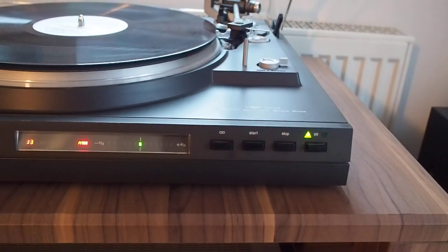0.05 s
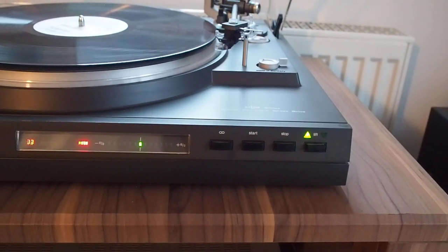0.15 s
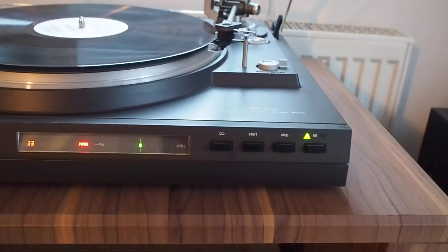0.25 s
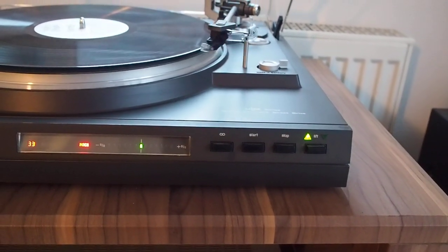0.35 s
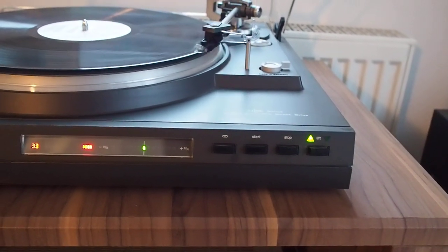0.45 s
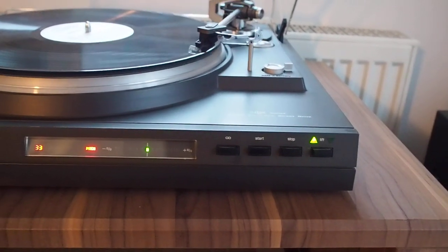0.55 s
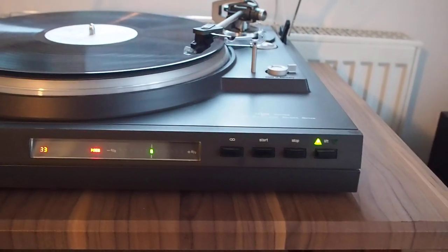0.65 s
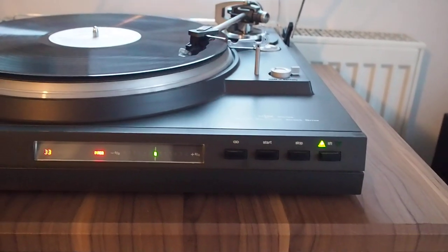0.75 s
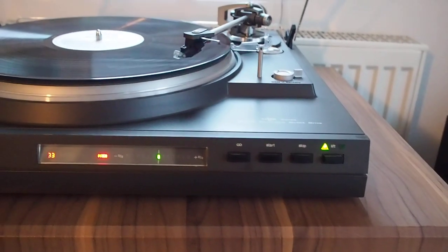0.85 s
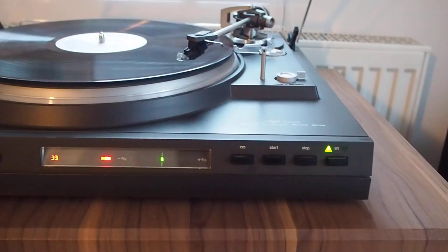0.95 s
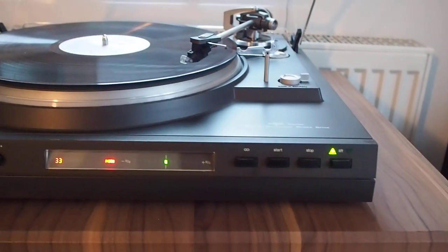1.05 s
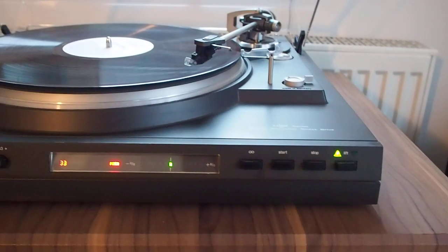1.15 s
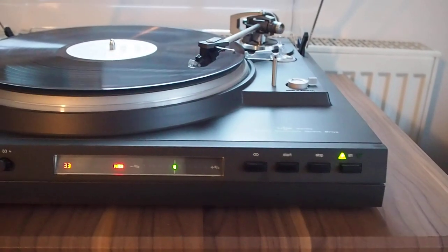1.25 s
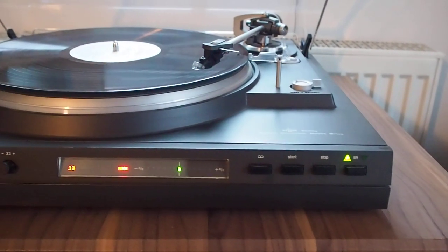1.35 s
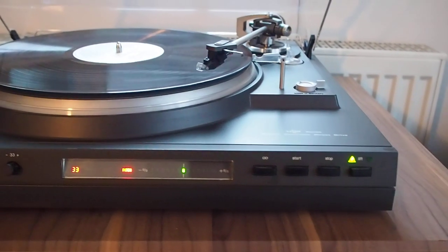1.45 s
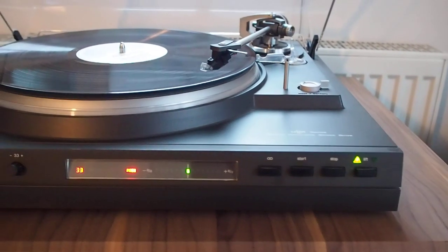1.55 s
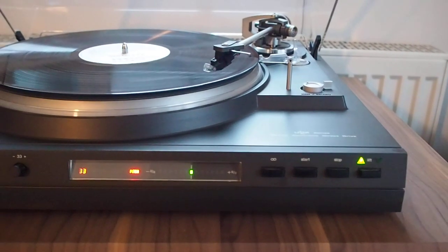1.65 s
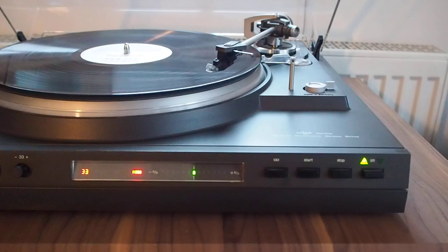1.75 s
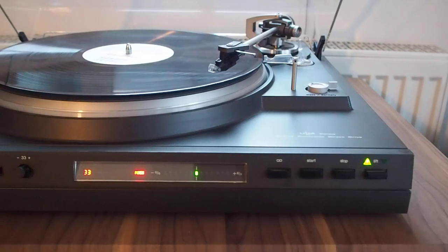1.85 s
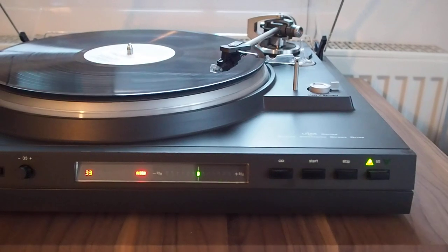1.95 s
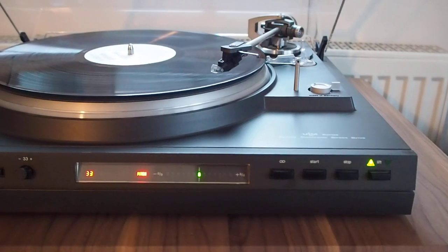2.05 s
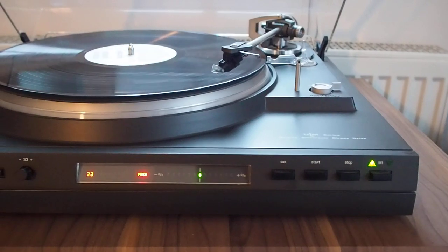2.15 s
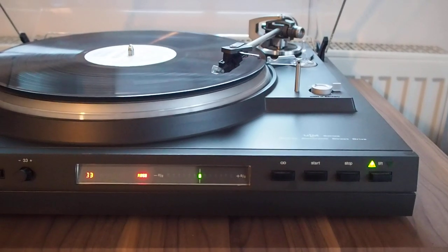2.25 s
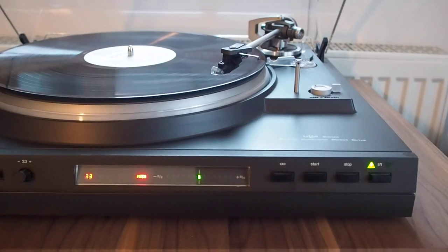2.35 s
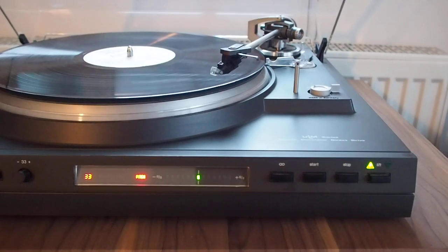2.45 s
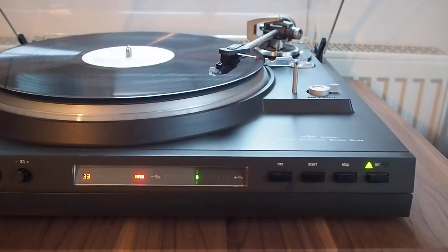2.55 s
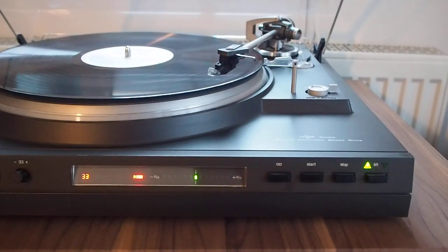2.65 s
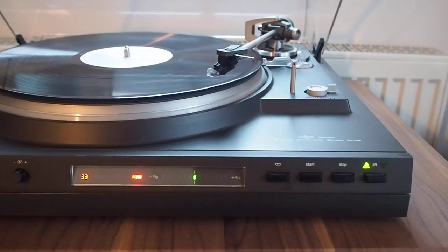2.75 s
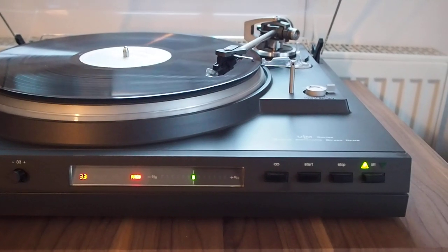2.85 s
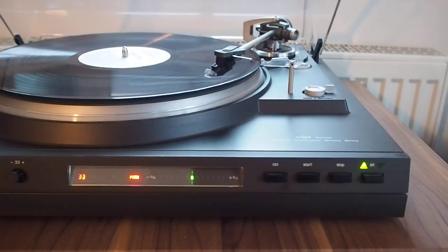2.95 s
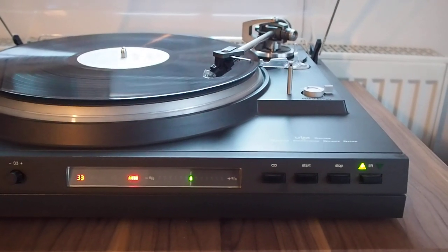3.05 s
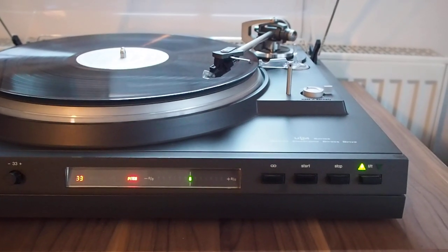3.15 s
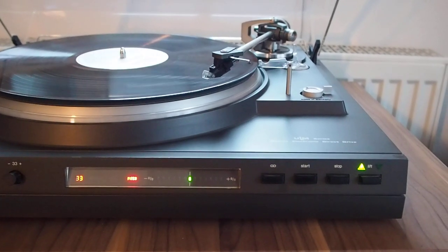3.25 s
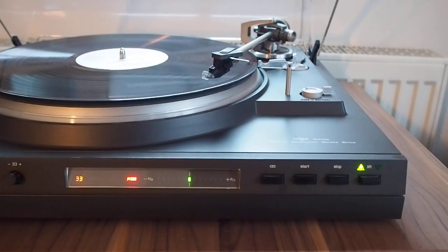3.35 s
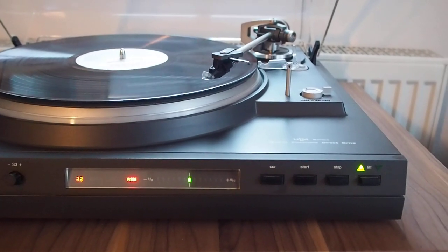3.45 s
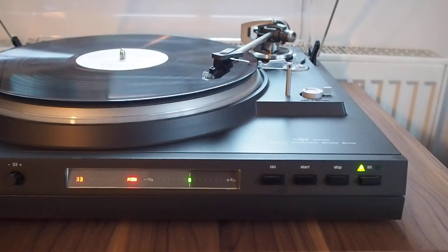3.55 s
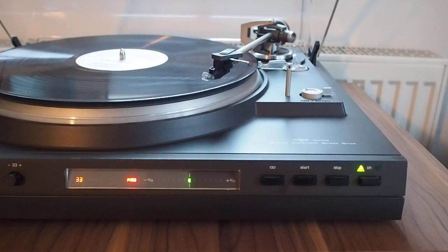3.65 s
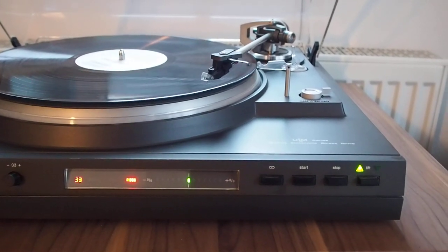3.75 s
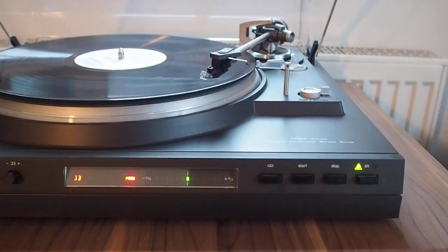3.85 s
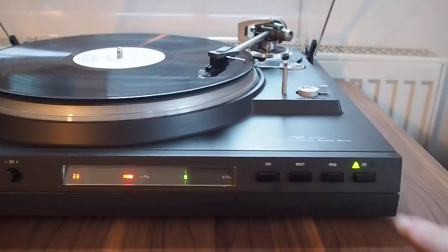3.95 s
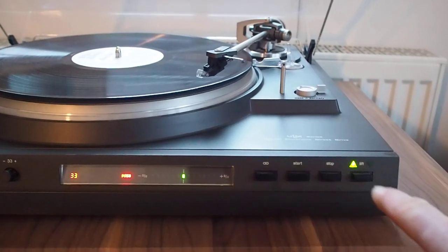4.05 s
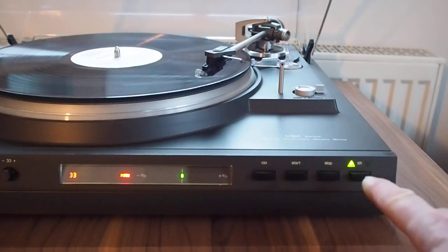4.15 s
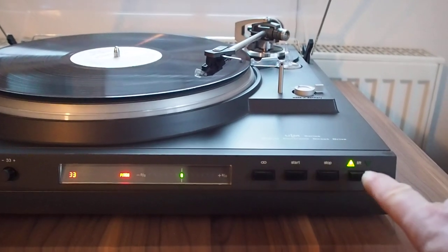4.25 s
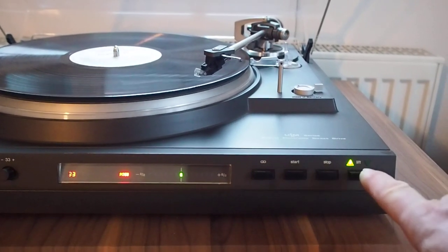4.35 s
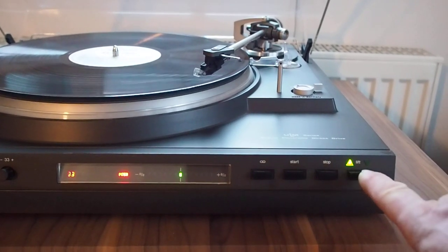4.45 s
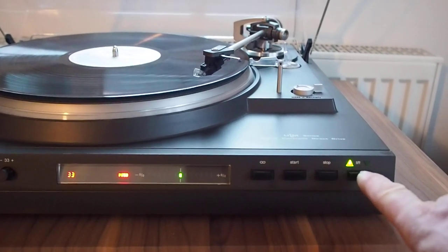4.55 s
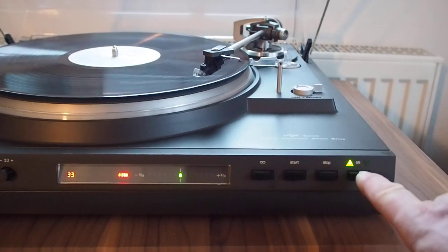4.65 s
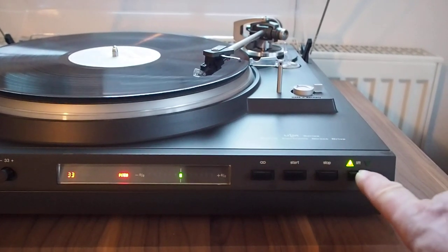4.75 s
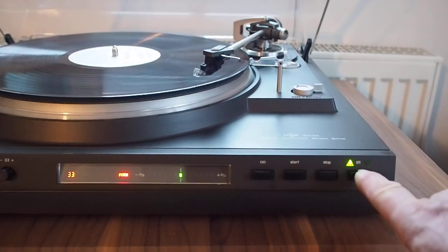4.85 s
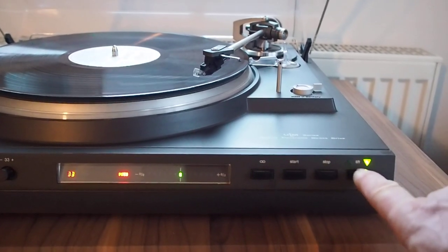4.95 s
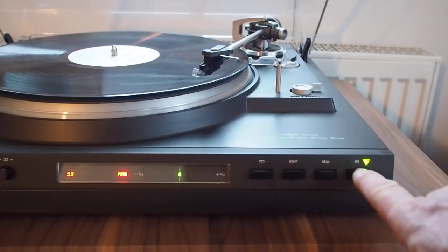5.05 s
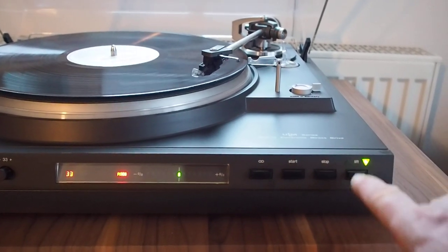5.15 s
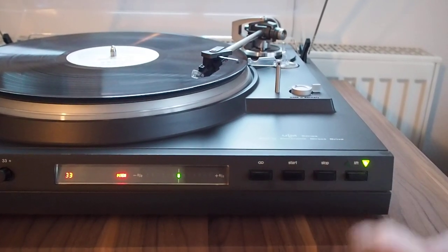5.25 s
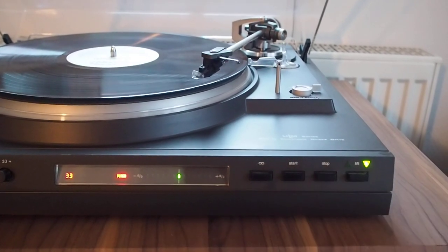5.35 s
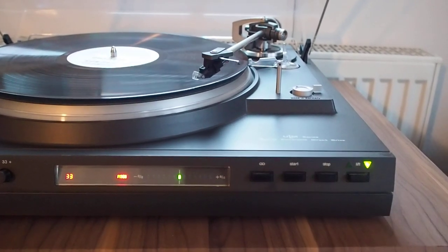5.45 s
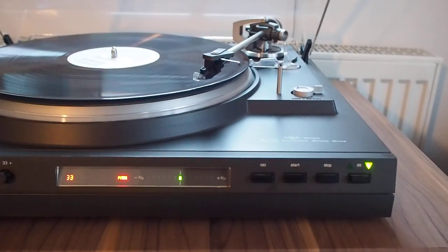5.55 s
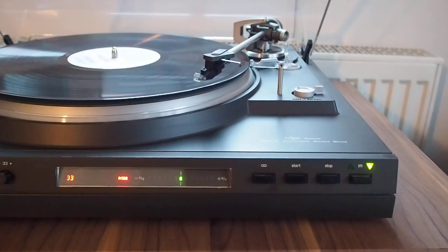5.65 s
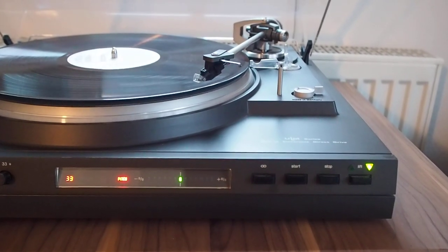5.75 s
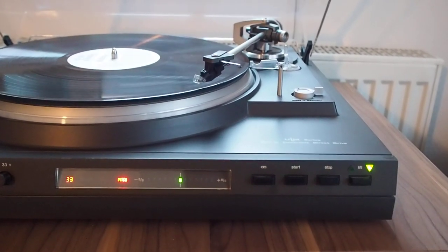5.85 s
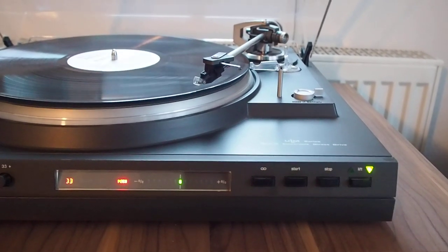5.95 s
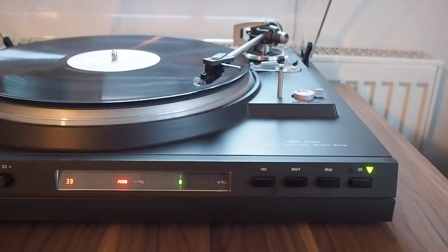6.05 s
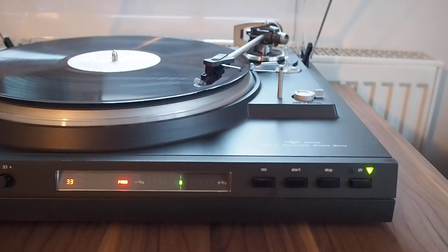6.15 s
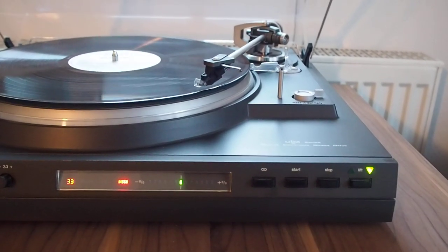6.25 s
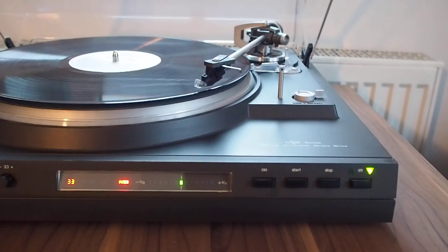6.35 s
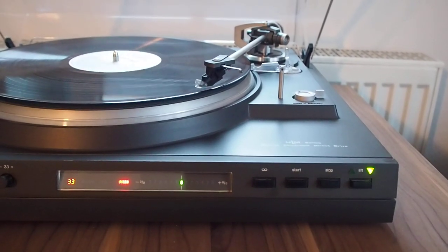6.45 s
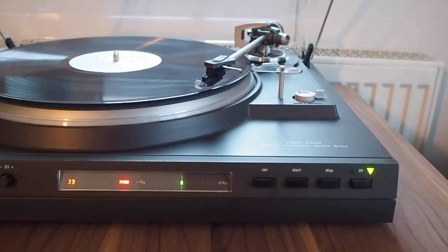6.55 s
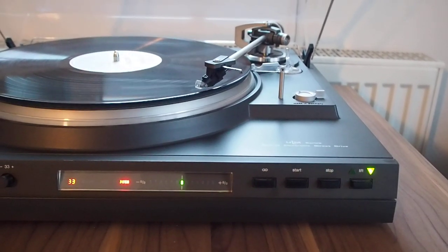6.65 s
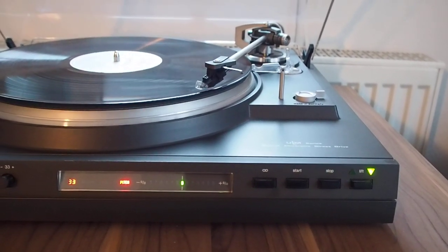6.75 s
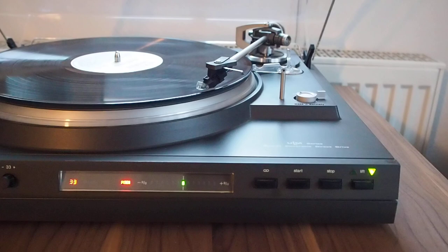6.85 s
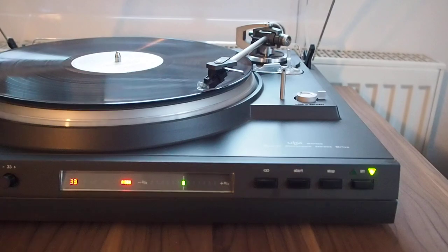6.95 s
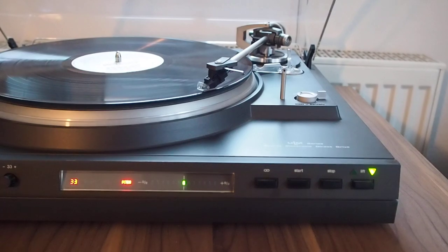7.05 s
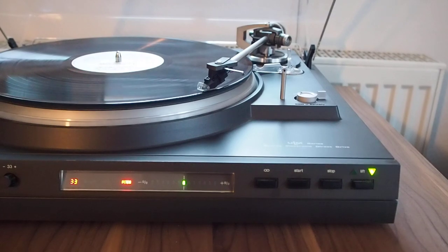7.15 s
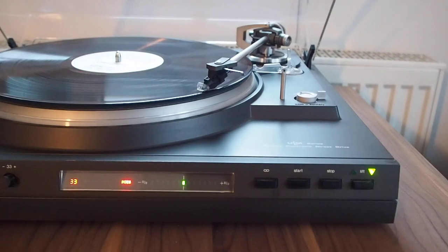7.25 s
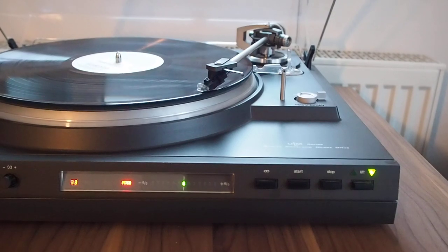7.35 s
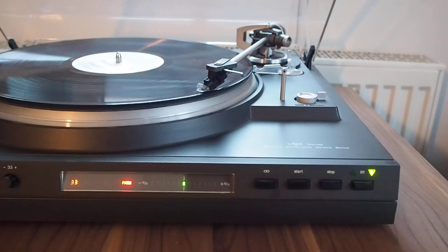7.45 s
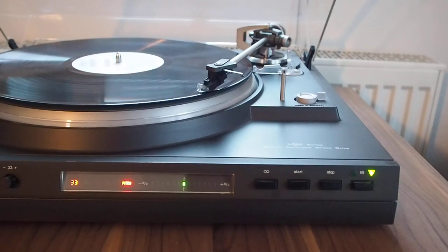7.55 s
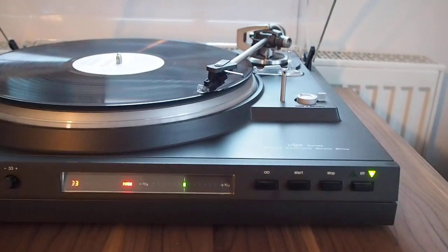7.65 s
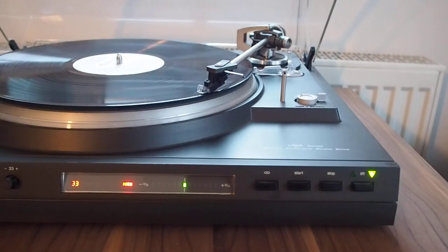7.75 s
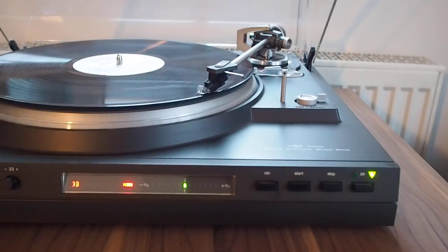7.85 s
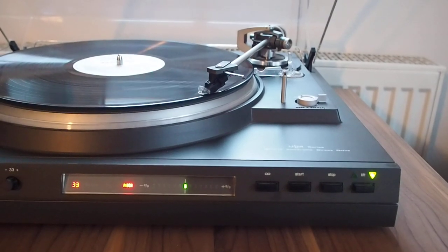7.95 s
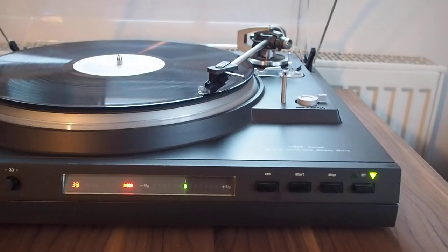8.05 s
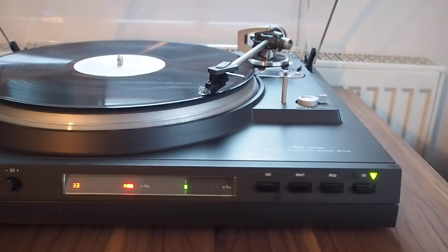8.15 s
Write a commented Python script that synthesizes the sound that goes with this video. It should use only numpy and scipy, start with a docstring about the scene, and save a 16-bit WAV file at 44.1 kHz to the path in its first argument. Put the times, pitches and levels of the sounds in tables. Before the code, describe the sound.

A quiet room with steady low rumble and microphone hiss, heard close to an automatic record player. Two faint ticks come at about 0.9 seconds, then soft dull knocks from the arm drive around 2.2. A sharp lever click at 2.6 starts a cluster of smaller mechanical clicks lasting until 3.3. Near 4 seconds the loudspeakers, farther away, give a short bassy thump with a little room ring. At 4.9 the lift button goes down with a crisp click and another thump, and it springs back with a second click around 5.2. The speakers thump again at 6.5 and pop softly at 7.2. At 7.4 the stylus lands with the loudest thump, a crack and a very brief scrape. Faint groove noise with a few small swells continues to the end, at about 8 seconds.

```python
"""A quiet room, close to an automatic record player. Levers click in the deck as the tonearm swings over, and a
finger presses and releases the lift button: each click is a burst of tiny impacts exciting the modes of the
deck or the button panel. Electrical pulses drive the loudspeakers and the room's bass modes into thumps, the
loudest as the stylus lands. Faint groove noise follows, over steady room rumble and microphone hiss."""
import sys
import numpy as np
from scipy import signal
from scipy.fft import rfft, irfft, next_fast_len
from scipy.io import wavfile
from scipy.ndimage import uniform_filter1d

SR = 44100
rng = np.random.default_rng(int(sys.argv[2]) if len(sys.argv) > 2 else 0)


def wrap_up_sound(samples):
    """Save the sound to the file named by the first command line argument, as 16-bit audio."""
    columns = np.atleast_2d(samples).T
    # keep every value between -1 and 1, then stretch to whole-number steps
    tamed = np.clip(columns, -1, 1)
    steps = np.round(tamed * 32767).astype(np.int16)
    wavfile.write(sys.argv[1], SR, steps)


N = 361459
TAPS = 16384
HZ = np.fft.rfftfreq(TAPS, 1 / SR)  # frequency axis of the gain curves

# Pulses reaching the loudspeakers, knock and crack relative to the bass: start_s, level_db, knock_db, crack_db
SPEAKER_PULSES = [(3.974, 22, -15.5, -7.5), (4.931, 20.3, -19, -18), (6.4623, 20.2, -12.5, -7.5),
                  (7.179, 8.8, -19, -16), (7.204, 9.8, -11.5, -7), (7.392, 34.3, -1.5, 0.5)]
# The stylus skidding into the groove: start_s, level_db, rise_s, decay_s
STYLUS_SKID = (7.411, 31.6, .011, 0.0028)
# Loudspeaker response: frequency_hz, gain_db
SPEAKER_RESPONSE = [(30, -55), (60, -25.5), (200, -11), (500, -16.5), (1150, -19), (1900, -32), (2700, -34),
                    (5500, -37), (9000, -52.5), (13000, -69), (16000, -83)]
# Standing waves of the room: pitch_hz, width_hz, gain_db
BASS_MODES = [(76.5, 14.7, 7.5), (99.4, 9.8, -1), (127.2, 7.6, -7.5), (169, 13.5, -3.5)]


def cone_thumps():
    """Impulse excitation: electrical pulses kick the loudspeaker cones and set the room's bass modes ringing."""
    out = np.zeros((1, N))
    gain = amp(read(SPEAKER_RESPONSE, HZ)) + sum(amp(db) * bell(hz, width) for hz, width, db in BASS_MODES)
    for start, db, knock_db, crack_db in SPEAKER_PULSES:
        colour_db = read([(110, 0), (450, knock_db), (4000, crack_db)], HZ)
        add(out, start, -impulse_response(gain * amp(db + colour_db))[None])
    start, db, rise, decay = STYLUS_SKID
    skid_db = read([(200, -20), (1500, -4), (4000, 0.5), (9000, 2.5)], HZ)
    scrape = impulse_response(gain * amp(db + skid_db))
    add(out, start, signal.fftconvolve(chatter(rise, decay), scrape)[None])
    return out[0]


# Early reflections off the walls: delay_s, gain_db
WALL_ECHOES = [(.0075, -4.5), (.0145, -11), (.0285, -10.5), (.038, -11)]
# Reverberation relative to the direct loudspeaker sound: frequency_hz, gain_db
SPEAKER_REVERB = [(70, -9), (160, 1), (300, 4), (700, 9), (1200, 4.5), (3000, 8.5), (9000, 4)]


def loudspeakers():
    """Multipath propagation: distant cones arrive as direct sound, wall echoes and a strong diffuse tail."""
    direct = cone_thumps()
    out = stereo(direct, 0) + reverberation(direct, SPEAKER_REVERB, onset_s=0.0058)
    reflected = tint(direct, [(120, -20), (450, -0.5)])  # furniture throws back little bass
    for k, (delay, db) in enumerate(WALL_ECHOES):
        lag = 3 * (-1) ** k  # samples; echoes come from either side in turn
        add(out, delay, amp(db) * np.array([np.roll(reflected, lag), np.roll(reflected, -lag)]))
    return out * pan(1.4)


# Levers catching: start_s, level_db, thud_db, knock_db, snap_db, low_ring_hz, high_ring_hz
LEVER_CATCHES = [ (0.888, -9, -10, 0, -11, 1880, 4660), (0.917, -12, -12, -4, -9, 1790, 2980),
                 (2.6103, 24, -3.5, 3.5, -2, 4140, 13200), (2.716, 9.5, 1, -7, -2, 2960, 4700),
                 (2.9442, 9.5, -2, 2.5, -0.5, 3120, 4520), (3.0155, 8, 12, 9.5, -23, 452, 4280),
                 (3.0617, 7, 6, -17, -10, 5130, 7900), (3.066, 15, 1, -8, -2, 4900, 8370),
                 (3.282, -0.5, 9, 6, -5, 4130, 5700)]
# Dull knocks of the arm drive: start_s, level_db, ring_hz
DRIVE_KNOCKS = [(2.168, -9.5, 590), (2.2556, -11.5, 525), (2.592, -16, 1020), (2.973, -14.5, 970)]
# Spectrum shared by the drive knocks: thud_db, knock_db, snap_db
DRIVE_COLOUR = (18, 21.3, -21)
# Broad radiation of the deck: frequency_hz, gain_db
DECK_RESPONSE = [(60, -62), (200, -18.5), (600, -15.5), (1400, -18), (2500, -24), (4000, -17), (5500, -13),
                 (9000, -15), (13000, -14), (16000, -25)]
# Deck resonances: pitch_hz, width_hz, gain_db
DECK_RESONANCES = [(253, 13, -4.5), (470, 44, -14), (539, 44, -9), (703, 47, -9), (980, 22, -1),
                   (1150, 44, -3), (1780, 180, -7.5), (2340, 26, -7), (2720, 93, -7.5), (3200, 200, -7.5),
                   (3560, 31, -3.5), (4154, 66, -5), (4820, 160, -19), (8050, 130, -14), (9060, 240, -8),
                   (11800, 200, -11), (12400, 360, -11)]


def levers(catch_rise_s=0.00286, knock_rise_s=0.0015, knock_ring_hz=1970):
    """Structure-borne sound: the levers and the arm drive strike the deck, which radiates at its modes."""
    catches = [(start, db, catch_rise_s, *colour) for start, db, *colour in LEVER_CATCHES]
    knocks = [(start, db, knock_rise_s, *DRIVE_COLOUR, hz, knock_ring_hz) for start, db, hz in DRIVE_KNOCKS]
    deck = body(DECK_RESPONSE, DECK_RESONANCES)
    return clicks(catches + knocks, deck, ring_db=11, bandwidth=0.088,
                  settle_s=0.009, firmness=0.13, pan_db=1.4)


# The button going down and springing back:
# start_s, level_db, rise_s, thud_db, knock_db, snap_db, low_ring_hz, high_ring_hz
BUTTON_CONTACTS = [ (4.9265, 12.5, 0.00025, -3, -1, -7, 2780, 3320),
                   (4.931, 15.5, 0.0025, -18, 0, 3, 5300, 8850),
                   (4.9452, 27.5, .0045, 0, 0, 1.5, 481, 2000),
                   (5.128, 14.5, 0.00061, -26, 3, -8.5, 2680, 4200),
                   (5.164, 2, 0.0044, -20, 18, -4, 3000, 4900),
                   (5.178, 18.5, 0.00039, 2, -17, -5, 5580, 8000),
                   (5.1805, 20, 0.0034, -4, -7.5, 5.5, 4800, 5570)]
# Broad radiation of the button panel: frequency_hz, gain_db
PANEL_RESPONSE = [(60, -57), (230, -13.5), (330, -33), (700, -21), (1450, -29), (2300, -10), (5000, -14),
                  (8000, -16.5), (13000, -22), (16000, -29)]
# Panel resonances: pitch_hz, width_hz, gain_db
PANEL_RESONANCES = [(451, 15, -4.5), (513, 30, -4), (657, 24, -11), (710, 45, -7), (980, 37, -14),
                    (1160, 71, -11), (1720, 95, -5.5), (1892, 55, 2.5), (2060, 41, -17), (2640, 68, -6.5),
                    (3220, 120, -6), (4240, 64, -6), (4960, 51, -2), (5700, 76, -10), (5620, 35, -3),
                    (8500, 150, -24.5), (11120, 200, -11), (11700, 150, -19), (13900, 200, -20)]


def lift_button():
    """Impact excitation: pressing and releasing the button sets its panel ringing."""
    panel = body(PANEL_RESPONSE, PANEL_RESONANCES)
    return clicks(BUTTON_CONTACTS, panel, ring_db=5, bandwidth=0.1,
                  settle_s=0.0154, firmness=0.368, pan_db=0.3)


# Anchors of a click's spectrum: thud_hz, knock_hz, flat_from_hz, flat_to_hz, snap_hz
CLICK_BANDS = [350, 1050, 2600, 5500, 12500]
# Side relative to mid for a near source: frequency_hz, gain_db
CLICK_WIDTH = [(200, -25), (1000, -20), (2500, -10.5), (5000, -7), (8000, 1), (13000, -4)]
# Reverberation relative to a click: frequency_hz, gain_db
CLICK_REVERB = [(100, 1.5), (300, -2), (1000, -4), (3000, -12), (6000, -11), (14000, -11)]


def clicks(rows, body_gain, ring_db, bandwidth, settle_s, firmness, pan_db):
    """Source and filter: contact chatter drives a body; the moving part adds colour and two resonances."""
    direct, radiated = np.zeros((2, N)), np.zeros((1, N))
    for start, db, rise, thud_db, knock_db, snap_db, low_hz, high_hz in rows:
        decay = settle_s * amp(-firmness * db)  # harder clicks settle sooner
        colour_db = read(list(zip(CLICK_BANDS, [thud_db, knock_db, 0, 0, snap_db])), HZ)
        part_db = ring_db * sum(bell(hz, bandwidth * hz) for hz in (low_hz, high_hz))
        gain = body_gain * amp(db + colour_db + part_db)
        side_gain = gain * amp(read(CLICK_WIDTH, HZ))
        contacts = chatter(rise, decay)
        mid = signal.fftconvolve(contacts, impulse_response(gain))
        side = signal.fftconvolve(chatter(rise, decay), impulse_response(side_gain))
        add(direct, start, stereo(mid, side) * pan(pan_db))
        add(radiated, start, signal.fftconvolve(contacts, impulse_response(all_round(gain)))[None])
    return direct + reverberation(radiated[0], CLICK_REVERB, onset_s=0.0017)


def chatter(rise_s, decay_s):
    """Broadband impacts: a part slides home and settles in tiny hard contacts, scaled to unit energy."""
    t = np.arange(TAPS // 4) / SR
    envelope = swell(t, rise_s, decay_s) + 1e-9
    contacts = envelope * rng.standard_normal(len(t)) * amp(1.53 * rng.standard_normal(len(t)))
    for _ in range(4):  # flatten the spectrum, then restore the envelope
        spectrum = rfft(contacts)
        contacts = irfft(spectrum / (abs(spectrum) + 1e-12))
        local_power = abs(uniform_filter1d(contacts ** 2, size=96))
        contacts *= envelope / np.sqrt(local_power + 1e-14)
    return contacts / np.linalg.norm(contacts)


def body(response, modes):
    """Modal summation: an object's resonances add in power to its broad response."""
    modal_power = sum(amp(db) ** 2 * bell(hz, width) for hz, width, db in modes)
    return np.sqrt(amp(read(response, HZ)) ** 2 + modal_power)


def all_round(gain):
    """Directional averaging: over all directions, a body's peaks and dips partly even out."""
    log_hz = np.geomspace(20, SR / 2, TAPS // 8)
    smooth = uniform_filter1d(np.interp(log_hz, HZ, gain), size=140)
    return np.sqrt(np.interp(HZ, log_hz, abs(smooth)) * gain)


# Reverberation time of the room: frequency_hz, t60_s
DECAY_TIMES = [(90, 0.5), (250, 0.5), (700, 0.47), (1800, 0.45), (5000, 0.38), (9000, 0.32), (14000, 0.23)]
# Side relative to mid for sound that fills the room: frequency_hz, gain_db
DIFFUSE_WIDTH = [(100, -25), (380, -18.5), (700, -9.5), (1300, -7), (2400, 0), (15000, 1.5)]


def reverberation(sound, colour, onset_s):
    """Diffuse field: dense reflections build up, then each band decays exponentially at its own rate."""
    hz, t, bands = signal.stft(rng.standard_normal((2, SR * 3 // 4)), SR, nperseg=256)
    decay_rate = np.log(1000) / read(DECAY_TIMES, hz)[:, None]
    bands *= np.exp(-decay_rate * t) * np.sqrt(2 * decay_rate / SR)  # equal energy in every band
    tail = signal.istft(bands, SR, nperseg=256)[1]
    build_up = 1 - np.exp(-np.arange(tail.shape[1]) / (onset_s * SR))
    mid, side = tint(tail, colour) * build_up
    return signal.oaconvolve(sound[None], stereo(mid, tint(side, DIFFUSE_WIDTH)), axes=1)[:, :N]


# Worn patches passing under the stylus: start_s, level_db
WORN_PATCHES = [(7.175, -53.5), (7.305, -50), (7.755, -57), (7.825, -56.5), (8.012, -54.5)]
# Spectrum of the surface noise: frequency_hz, gain_db
GROOVE_SPECTRUM = [(40, 16), (100, 17.5), (300, 10), (1000, 5), (2000, 0), (5500, 1.5), (9000, -9),
                   (15000, -22)]


def groove():
    """Surface noise: a faint steady bed from the first touch on, to which each worn patch adds in power."""
    t = np.arange(N) / SR
    first_touch_s = WORN_PATCHES[0][0]
    power = amp(-64.5) ** 2 * (t > first_touch_s)
    for start, db in WORN_PATCHES:
        power += (amp(db) * swell(t - start, rise_s=0.033, decay_s=0.064)) ** 2
    return amp(4.5) * np.sqrt(power) * noise(GROOVE_SPECTRUM, DIFFUSE_WIDTH)


# Room rumble and microphone hiss: frequency_hz, gain_db
FLOOR_SPECTRUM = [(24, -38), (38, -33), (75, -37.5), (140, -38), (210, -33), (350, -44), (460, -42.5),
                  (560, -33.5), (720, -46.5), (1050, -44.5), (1650, -50.5), (2400, -55), (5500, -54.5),
                  (9000, -61), (15500, -67.5)]
# Their side relative to mid: frequency_hz, gain_db
FLOOR_WIDTH = [(60, -5.5), (200, -6), (700, -4.5), (1300, 0), (2400, 0), (15000, 0.5)]


def noise_floor():
    """Stationary noise: the room rumbles and the microphone hisses throughout."""
    return noise(FLOOR_SPECTRUM, FLOOR_WIDTH) * pan(1.6)


def noise(colour, width):
    """Partial coherence: independent mid and side noises of one colour, the side filtered by width."""
    mid, side = tint(rng.standard_normal((2, N)), colour)
    return stereo(mid, tint(side, width))


def swell(t, rise_s, decay_s):
    """Linear attack from t = 0, then exponential decay."""
    return np.clip(t / rise_s, 0, 1) * np.exp(-np.maximum(t - rise_s, 0) / decay_s)


def bell(hz, width_hz):
    """Lorentzian power curve of one resonance."""
    return 1 / (1 + (2 * (HZ - hz) / width_hz) ** 2)


def impulse_response(gain):
    """Minimum phase: the causal response that has this gain curve."""
    log_gain = np.log(np.maximum(np.r_[gain, gain[-2:0:-1]], 1e-6))
    spectrum = np.exp(np.conj(signal.hilbert(log_gain)))
    return np.fft.ifft(spectrum).real[:TAPS // 2]


def tint(sound, points):
    """Zero-phase filtering by (frequency_hz, gain_db) points."""
    size = next_fast_len(sound.shape[-1] + 2048)
    gain = amp(read(points, np.fft.rfftfreq(size, 1 / SR)))
    return irfft(rfft(sound, size) * gain, size)[..., :sound.shape[-1]]


def read(points, hz):
    """Interpolation of (frequency_hz, value) points on a logarithmic frequency axis."""
    point_hz, value = np.transpose(points)
    return np.interp(np.log(hz + 1), np.log(point_hz + 1), value)


def amp(db):
    """Decibels to amplitude ratio."""
    return 10 ** (np.asarray(db) / 20)


def pan(db):
    """Level difference: channel gains with the left db above the right."""
    return amp([[db / 2], [-db / 2]])


def stereo(mid, side):
    """Sum and difference give left and right."""
    return np.array([mid + side, mid - side])


def add(mix, start_s, sound):
    """Superposition of a sound on the mix from start_s on."""
    part = mix[:, round(start_s * SR):][:, :sound.shape[1]]
    part += sound[:, :part.shape[1]]


def scene():
    """Superposition: the player's mechanism, its loudspeakers, the groove and the quiet room."""
    mechanism = amp(-0.5) * (levers() + lift_button())
    return mechanism + loudspeakers() + groove() + noise_floor()


# Notches of the microphone port: frequency_hz, width_hz, gain_db
PORT_NOTCHES = [(1242, 76, -6.5), (1618, 240, -5.5), (6596, 640, -10), (10450, 920, -11)]


def record(dry, ceiling=0.9, cutoff_hz=15900, dc_offset=-0.0028):
    """Filtering and saturation: the port cuts notches, the preamp rounds peaks, a low-pass ends the band."""
    port = impulse_response(amp(sum(db * bell(hz, width) for hz, width, db in PORT_NOTCHES)))
    notched = signal.oaconvolve(dry, port[None], axes=1)[:, :N]
    rounded = ceiling * np.tanh(notched / ceiling)
    low_pass = signal.firwin(401, cutoff_hz, window=("kaiser", 9), fs=SR)
    return dc_offset + signal.oaconvolve(rounded, low_pass[None], "same")


dry = scene()
out = record(dry)
wrap_up_sound(out)
```